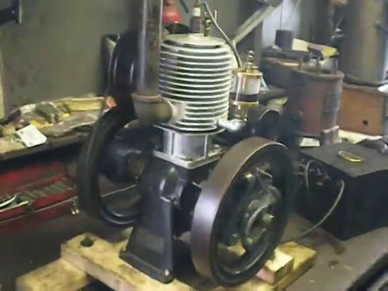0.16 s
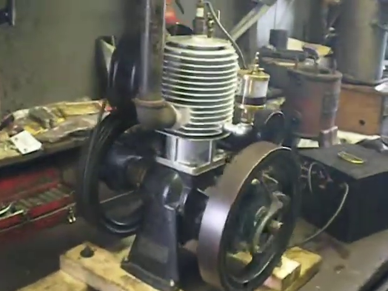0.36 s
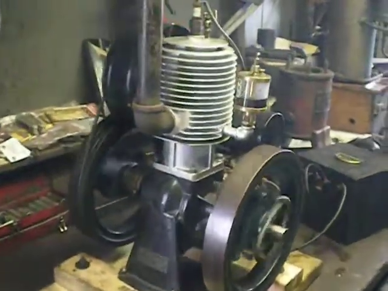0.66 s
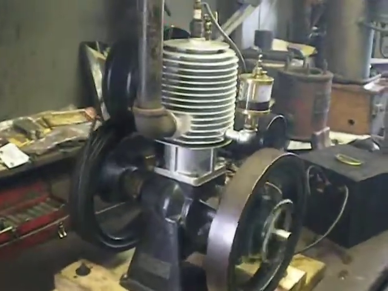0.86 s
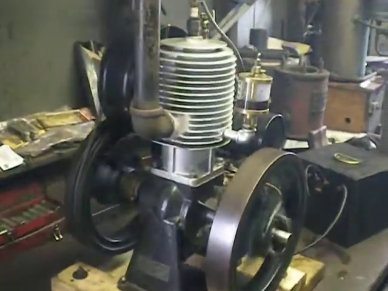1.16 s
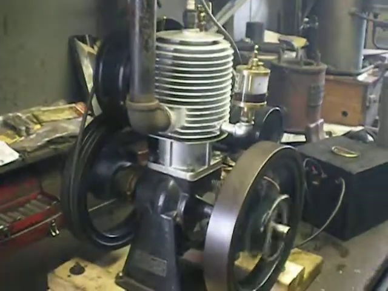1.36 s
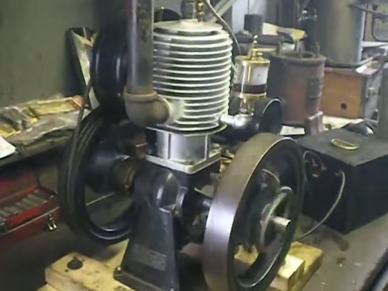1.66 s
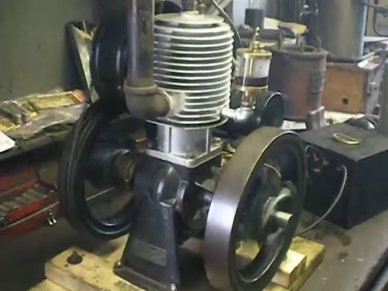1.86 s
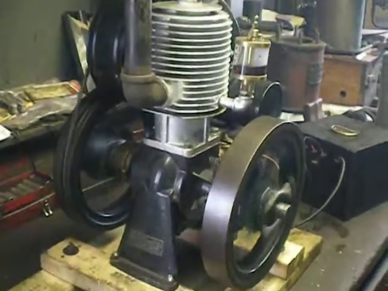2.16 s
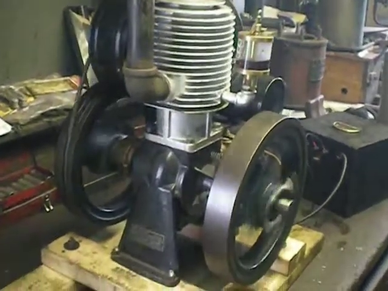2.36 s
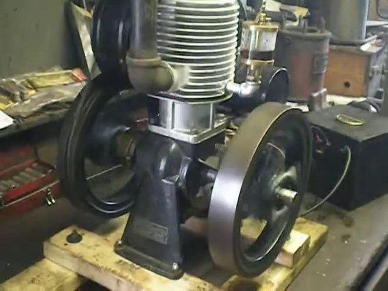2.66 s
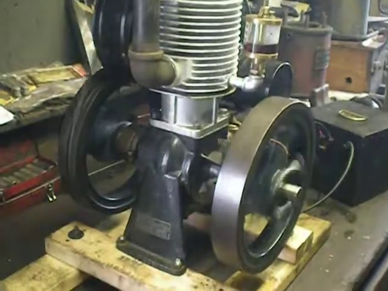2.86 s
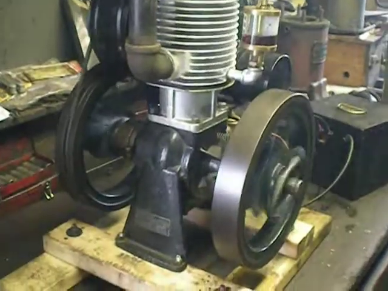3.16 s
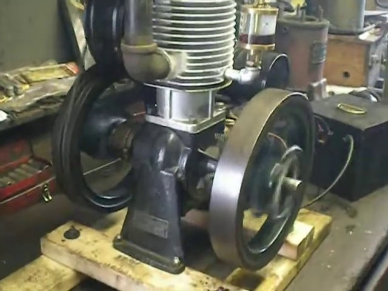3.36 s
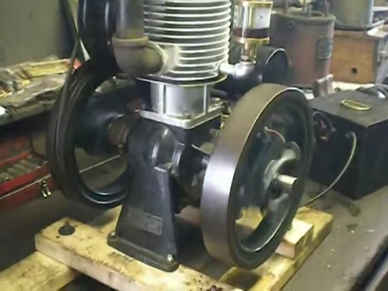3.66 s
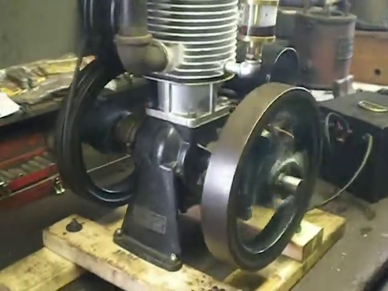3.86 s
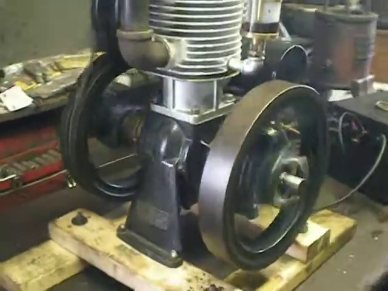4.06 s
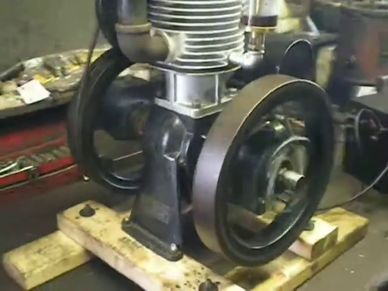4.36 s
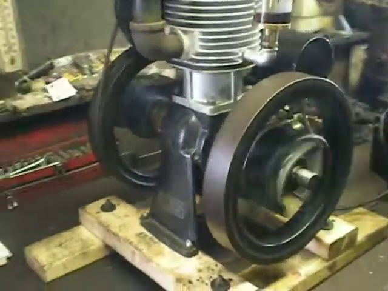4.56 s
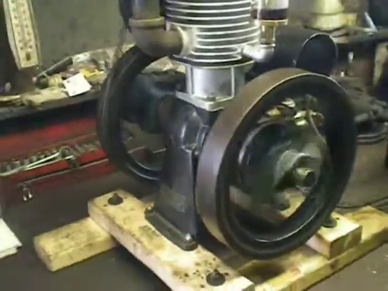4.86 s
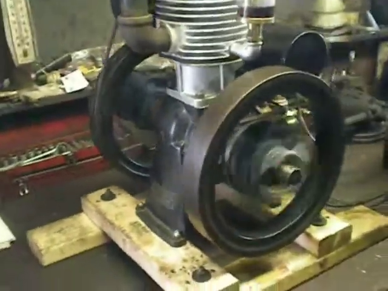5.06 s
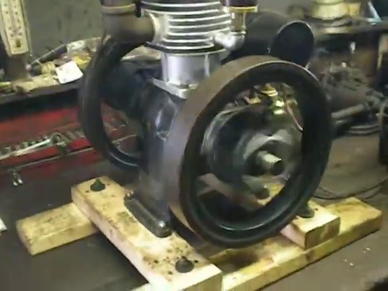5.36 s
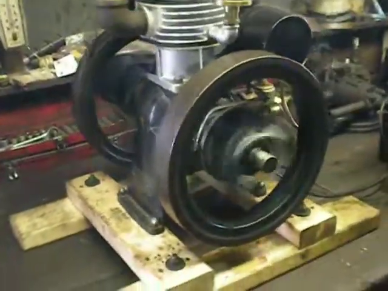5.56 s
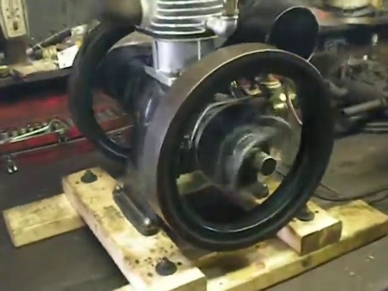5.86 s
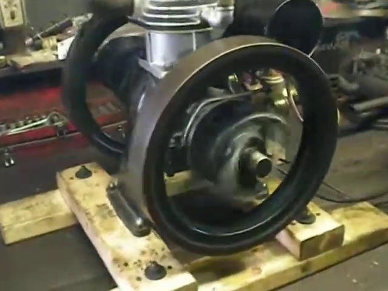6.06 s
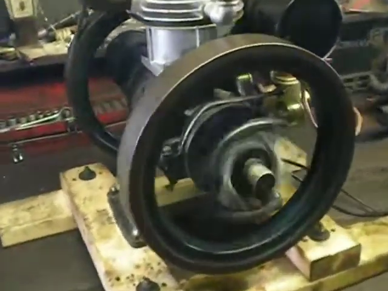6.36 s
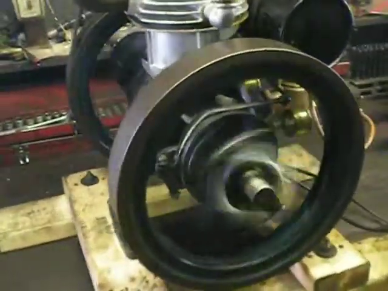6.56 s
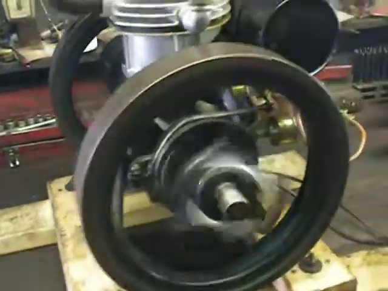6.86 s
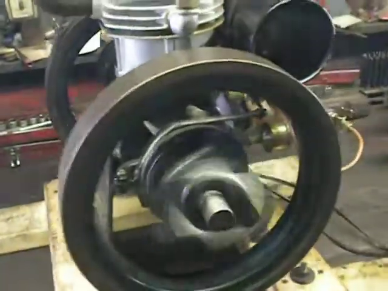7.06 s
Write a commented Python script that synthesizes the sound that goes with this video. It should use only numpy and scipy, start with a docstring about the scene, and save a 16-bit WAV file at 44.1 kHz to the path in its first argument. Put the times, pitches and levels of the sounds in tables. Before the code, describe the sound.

An old single-cylinder engine idles for about seven seconds, close up in a modestly reverberant workshop. It opens on a hollow drone, hiss and whirr; at about 0.1 s comes the first rasp, slap and hard metallic knock, repeating roughly five times a second with slight unevenness. Around 0.08 s after each knock a duller thump starts a low, hollow hoot near 200-250 Hz and a swelling airy hiss that fray before the next blow. Firings near 1.2, 1.6, 1.9 and 2.3 s add a boom, sputtering chuff and pop, softening the knock. After a gap without firing, more follow between 3.3 and 4.8 s, then at 5.8, 6.5 and 6.9 s. Tiny squeaks flick by near 1.3, 1.8, 3.5, 4.6 and 6.6 s. The flywheel's ring dips around 4 s, then grows stronger by 4.8 s, while the case pitch drifts slightly lower. Treble is muffled, peaks clipped; it keeps running to the end.

```python
"""A hollow drone, a hiss and a whirr are heard first; then rasp, slap and hard knock, about five times a second.
The source is an old air-cooled single-cylinder engine on wooden skids, idling in a workshop and firing now and then.
Its loose running gear strikes damped metal modes; a thump in mid-cycle starts the air resonance and turbulent hiss.
A firing adds a boom, a chuff and a pop from the exhaust pipe, made of a decaying tone and shaped noise.
A close microphone channel cuts the treble, then clips the loudest peaks."""
import sys
import numpy as np
from scipy import signal
from scipy.fft import rfft, irfft, next_fast_len
from scipy.io import wavfile

SR = 44100
rng = np.random.default_rng(int(sys.argv[2]) if len(sys.argv) > 2 else 0)


def wav_out(sig):
    """Save sig, one row per channel (or a flat mono array), as 16-bit PCM at SR to the path in sys.argv[1]."""
    wavfile.write(sys.argv[1], SR, np.round(np.clip(np.atleast_2d(sig).T, -1, 1) * 32767).astype(np.int16))


N = 318402
TIME = np.arange(N) / SR
STRIKE_TIME = np.arange(SR // 4) / SR  # time axis of one event, a quarter second

# Engine cycles: [knock t/s, relative knock level/dB, relative thump level/dB, air drawn after thump (0-1)]
CYCLES = [(-.12, 0, -9, 0.36), (.082, -11, -13.5, 0.58), (.2925, -10.5, -19.5, 0.4),
          (.494, -9.5, -15, 0.28), (0.6964, -10, -13.5, 0.7), (.912, -11, -17.5, 0.36),
          (1.122, -13.5, -15, 1), (1.349, -11.5, -17, 0.19), (1.526, -11.5, -13, .5),
          (1.7138, -10.5, -21, .15), (1.894, -17.5, -12.5, 0.49), (2.0792, -12, -16.5, 0.32),
          (2.2717, -11.5, -14, 0.49), (2.4735, -9.5, -19.5, 0.26), (2.667, -10, -15.5, 0.2),
          (2.871, -10.5, -13, 0.61), (3.082, -10, -15.5, 0.07), (3.286, -11, -12.5, 0.98),
          (3.512, -10, -17, .25), (3.689, -12, -14.5, 0.86), (3.88, -10.5, -22, 0.14),
          (4.059, -13, -14, 0.99), (4.2555, -10, -22, 0.04), (4.429, -11, -14.5, 0.74),
          (4.615, -11, -23.5, 0.06), (4.793, -13, -14.5, 0.5), (4.978, -11, -18.5, 0.2),
          (5.172, -12, -14.5, .6), (5.372, -11.5, -18, .45), (5.575, -12, -18.5, .35),
          (5.779, -10.5, -15, 0.62), (5.996, -11.5, -20, .3), (6.212, -10, -27, 0.2), (6.416, -12, -15, 1),
          (6.65, -11.5, -27.5, .25), (6.844, -15, -14.5, 1.), (7.0572, -11.5, -26, 0.16)]
# Firings, each lit at the knock before its pop: [pop t/s, relative chuff level/dB, relative pop level/dB]
FIRINGS = [(1.161, -23.5, -13), (1.56, -29, -26.5), (1.907, -23.5, -9), (2.305, -29.5, -30),
           (3.328, -24.5, -10), (3.722, -26, -11), (4.095, -23, -17.5), (4.464, -28, -9.5),
           (4.832, -31.5, -18), (5.82, -26.5, -21), (6.459, -23, -11), (6.881, -23.5, -20)]
# Brief squeaks, most of them just before the knock that follows a firing: [t/s, f/Hz, relative level/dB]
CHIRPS = [(1.329, 1820, -14), (1.838, 1778, -17.5), (3.492, 1788, -15.5), (4.594, 2080, -19.5),
          (6.635, 1810, -18.5)]
# Crankcase modes before pitch scaling and contact damping: [f/Hz, t60/s, relative level/dB]
BODY_MODES = [(263.6, 0.42, -10.5), (273.1, 0.15, -2), (414, 0.024, -26), (487, 0.026, -10.5),
              (607.5, 0.077, 9), (702.5, 0.067, -2.5), (844.8, 0.097, -1), (880, 0.0033, -17)]
# Thin iron parts, same conditions, excited by hard blows: [f/Hz, t60/s, relative level/dB]
IRON_MODES = [(1020, 0.075, -12.5), (1174, 0.03, 15), (1270, 0.088, -9), (1680, .02, -32),
              (1912, 0.056, -13.5), (2060, 0.008, -6.5), (3860, 0.012, -7.5)]
# Spectrum of the rattling metal contact: [f/Hz, relative level/dB]
CRACK_SPECTRUM = [(60, -38.5), (200, -7.5), (500, -2.5), (1100, 5), (1900, 2), (2700, -10), (3600, -4.5),
                  (4500, -2)]
# Spectrum of the turbulent intake air: [f/Hz, relative level/dB]
HISS_SPECTRUM = [(60, -39.5), (150, -29.5), (300, -6), (450, -1.5), (600, 3.5), (1000, -2), (1550, -4),
                 (2000, 3), (2350, 1), (2800, -5), (3600, -6), (4500, -8)]
# Spectrum of dry rubbing parts: [f/Hz, relative level/dB]
RASP_SPECTRUM = [(300, -11.5), (1200, 6.5), (2100, 5), (2700, -3.5), (3150, -1.5), (3650, 5.5),
                 (4500, -5.5)]
# Spectrum of the exhaust gas: [f/Hz, relative level/dB]
CHUFF_SPECTRUM = [(50, -38), (110, -19.5), (220, -18.5), (300, -10.5), (450, -7), (750, 3.5), (1000, -3),
                  (1250, 5.5), (1550, -7), (1850, -2.5), (2600, -31), (3500, -12), (4500, -17.5)]
# Spectrum of bearings, belt and flywheels: [f/Hz, relative level/dB]
WHIRR_SPECTRUM = [(25, -37.5), (70, -23), (115, -9), (160, -13.5), (290, 0.5), (450, -2.5), (600, -2),
                  (830, 3.5), (1000, -1.5), (1250, 0.5), (1900, -7), (2650, -14.5), (3600, -7.5),
                  (4500, -15)]
# Effect of facing the flywheel: [t/s, relative flywheel level/dB, relative drone level/dB]
FACING = [(0, -6.5, -0.5), (2.2, -6.5, 1.5), (3.9, -20.5, -1.5), (4.8, 2.5, 1.5), (5.9, 0.5, -0.5),
          (7.2, -1.5, 4)]
# Reference pitch of the case, mostly falling as the microphone comes round: [t/s, f/Hz]
CASE_PITCH = [(0, 598), (3, 594), (5, 570), (6, 578), (6.7, 548)]

CASE_REFERENCE_HZ = 595  # case pitch at which the body modes are unscaled
LAST_CYCLE_S = .2
THUMP_SHARE, RASP_SHARE = .39, .14  # of a cycle: thump after the knock, rasp before the next
CUSHION_POP_DB = -13  # a firing that pops this loud cushions the knock fully
DRONE_HZ, DRONE_DROP_HZ = 252.9, 51.38  # before the bend in each stroke: no air drawn; fall at full draw
SLAP_LEAD_S, SLAP_SCATTER_S = .0138, .0007
SHOP_T60_S, SHOP_DB = .33, -14
BAND_HZ, STOP_HZ, TOP_HZ = 3756, 4340, 15900  # microphone low-pass edges
CLIP = .71  # amplitude limit


def undb(db):
    """Logarithmic level: decibels become an amplitude ratio."""
    return 10 ** (np.asarray(db) / 20)


def fade(t, t60):
    """Exponential decay: the level falls 60 dB in t60 seconds."""
    return np.exp(-np.log(1000) * t / t60)


def add(out, s, sound):
    """Superposition: mix a sound in from time s, trimmed to the scene."""
    i = int(round(s * SR))
    a, b = max(i, 0), min(i + len(sound), N)
    if b > a:
        out[a:b] += sound[a - i:b - i]


def noise(colour, size=N):
    """Spectral shaping: filter white noise by (f/Hz, level/dB) points and normalise to rms 1."""
    hz, db = np.transpose(colour)
    n = next_fast_len(size)
    f = np.maximum(np.fft.rfftfreq(n, 1 / SR), 1)
    gain = undb(np.interp(np.log(f), np.log(hz), db))
    shaped = irfft(rfft(rng.standard_normal(n)) * gain, n)[:size]
    return shaped / shaped.std()


def flutter(rate):
    """Random modulation: straight lines join `rate` random values a second, with spread 1."""
    knots = rng.standard_normal(int(N / SR * rate) + 2)
    return np.interp(TIME * rate, np.arange(len(knots)), knots) * np.sqrt(3 / 2)


def cycles():
    """Engine timing: knock time, length, knock dB, thump dB, draw, previous draw (charge), burn (0-1)."""
    s, knock, thump, draw = np.transpose(CYCLES)
    draw = np.clip(draw, 0, 1)
    burns = {last_knock(pop_s): min(undb(pop - CUSHION_POP_DB), 1) for pop_s, _, pop in FIRINGS}
    length = np.diff(s, append=s[-1] + LAST_CYCLE_S)
    burn = [burns.get(t, 0) for t in s]
    return list(zip(s, length, knock, thump, draw, np.roll(draw, 1), burn))


def last_knock(s):
    """Event order: time of the knock just before s."""
    return max(row[0] for row in CYCLES if row[0] < s)


def workshop(x):
    """Diffuse reverberation: a decaying noise tail begins 5 ms after the direct sound."""
    tail = rng.standard_normal(len(STRIKE_TIME)) * fade(STRIKE_TIME, SHOP_T60_S) * (STRIKE_TIME > .005)
    tail /= np.sqrt(np.sum(tail ** 2))
    return x + undb(SHOP_DB) * signal.fftconvolve(x, tail)[:N]


def whirr(whirr_db=-25.5, grain_db=1.0, swell_db=2.5, rise_db=0.5, rise_share=0.15, rise_width=0.16):
    """Continuous friction noise: bearings, belt and flywheels run on, slightly louder after each knock."""
    knock_times = [row[0] for row in CYCLES]
    knock_times.append(knock_times[-1] + LAST_CYCLE_S)
    cycle_phase = np.interp(TIME, knock_times, np.arange(len(knock_times))) % 1
    rise = rise_db * np.exp(-((cycle_phase - rise_share) / rise_width) ** 2)
    level_db = whirr_db + rise + grain_db * flutter(300) + swell_db * flutter(25)
    return noise(WHIRR_SPECTRUM) * undb(level_db)


def skids(thud_db=-32.5, thud_hz=115.0, thud_t60=0.22, jolt_db=-44.0, jolt_s=0.0013):
    """Impulse response of a support: each knock jolts the skids, which boom on the bench."""
    out = np.zeros(N)
    tone = np.sin(2 * np.pi * thud_hz * STRIKE_TIME)
    boom = undb(thud_db) * tone * fade(STRIKE_TIME, thud_t60)
    jolt = undb(jolt_db) * np.exp(-STRIKE_TIME / jolt_s)
    for s, *_ in CYCLES:
        add(out, s, -boom - jolt)
    return out


def resonance(hz, rough):
    """Flow-sustained resonance: turbulence unsteadies the level and phase of a tone of rms 1."""
    flow = 1 + rough * (flutter(80) + 1j * flutter(80))
    carrier = np.exp(2j * np.pi * np.cumsum(hz) / SR)
    return np.real(flow * carrier) / np.sqrt(1 / 2 + rough ** 2)


def air(early_db=-25.5, early_draw_db=-1.5, late_db=-27.5, late_draw_db=-5.5, upper_db=-9.0,
        upper_ratio=2.55, hiss_db=-26.5, hiss_draw_db=5.0, sag=.06, grain_db=2.5):
    """Air resonance and turbulence: a drone and hiss from thump to knock; deep draw lowers and steadies it."""
    drone_gain, hiss_gain, rough = np.zeros((3, N))
    hz = np.full(N, DRONE_HZ, float)
    for s, length, _, _, draw, _, _ in cycles():
        start, end = s + THUMP_SHARE * length, s + length
        live = (TIME >= start) & (TIME < end)
        u = (TIME[live] - start) / (end - start)
        # pitch is lowest in mid-stroke
        hz[live] = (DRONE_HZ - DRONE_DROP_HZ * draw) * (.99 + sag * (2 * u - 1) ** 2)
        # the drone frays as the flow grows turbulent
        rough[live] = .1 + (.8 - .6 * draw) * u ** 2
        early, late = early_db + early_draw_db * draw, late_db + late_draw_db * draw
        drone_levels = undb([-60, early, early - .5, late, late - 1.5, -60])
        drone_gain[live] = np.interp(u, [0, .03, .28, .55, .9, 1], drone_levels)
        swell = np.interp(u, [0, .2, .45, .75, .88, 1], [-10.5, -4, 2.5, 3.5, 0.5, -16.0])
        hiss_gain[live] = undb(hiss_draw_db * draw + swell)
    drone = resonance(hz, rough) + undb(upper_db) * resonance(upper_ratio * hz, 2 * rough)
    hiss = noise(HISS_SPECTRUM) * hiss_gain * undb(hiss_db + grain_db * flutter(450))
    # both resonances break up late in the stroke
    drone *= 1 - np.clip(.5 * rough * (1 + flutter(30)), 0, .9)
    times, _, near_db = np.transpose(FACING)
    return undb(np.interp(TIME, times, near_db)) * drone_gain * drone + hiss


def scrapes(rasp_db=-16.0, rasp_s=0.005, scatter_db=1.5, chirp_db=1.5, chirp_s=0.0046):
    """Dry friction: rubbing noise peaks ahead of each slap; brief tones squeak at listed times."""
    peaks = [s + (1 - RASP_SHARE) * length for s, length, *_ in cycles()]
    sizes = undb(rasp_db + scatter_db * rng.standard_normal(len(peaks)))
    envelope = sum(size * np.exp(-np.abs(TIME - s) / rasp_s) for s, size in zip(peaks, sizes))
    out = envelope * noise(RASP_SPECTRUM)
    wobble = 0.12 * flutter(770)  # phase, rad
    for s, hz, db in CHIRPS:
        pulse = np.exp(-((TIME - s) / chirp_s) ** 2)
        tone = np.sqrt(2) * np.sin(2 * np.pi * hz * TIME + wobble)
        out += undb(db + chirp_db) * pulse * tone
    return out


def attack_level(y):
    """Onset normalisation: scale an event to rms 1 over its first 9 ms."""
    return y / np.sqrt(np.mean(y[:SR * 9 // 1000] ** 2))


def exhaust(chuff_db=9.0, pop_db=-5.0, boom_db=9.5, boom_hz=276.0, boom_t60=0.13, grain_db=2.0):
    """Pulsed gas flow: a firing booms in the cylinder, gas sputters in a swell, and a pop sounds in the pipe."""
    out, gas = np.zeros((2, N))
    rush = np.interp(STRIKE_TIME, [.012, .022, .038, .05, .066], [0.16, 0.53, 1.0, 0.54, 0])
    onset = 1 - np.exp(-STRIKE_TIME / 0.0005)
    boom = np.cos(2 * np.pi * boom_hz * STRIKE_TIME) * fade(STRIKE_TIME, boom_t60) * onset
    for pop_s, db, pop_level_db in FIRINGS:
        s = last_knock(pop_s)
        add(out, s, undb(db + boom_db) * boom)
        add(gas, s, undb(db + chuff_db) * rush * noise(CHUFF_SPECTRUM, size=len(STRIKE_TIME)))
        pop = attack_level(noise(CHUFF_SPECTRUM, size=len(STRIKE_TIME)) * fade(STRIKE_TIME, 0.043))
        add(out, pop_s, undb(pop_level_db + pop_db) * pop)
    return out + gas * undb(grain_db * flutter(250))


def flywheel(blows, wheel_hz=815.4, width_hz=59.0, wheel_db=3.0):
    """Resonant filtering: blows travel down the crankshaft and ring the flywheel."""
    b, a = signal.iirpeak(wheel_hz, wheel_hz / width_hz, fs=SR)
    s, db, _ = np.transpose(FACING)
    return undb(wheel_db + np.interp(TIME, s, db)) * signal.lfilter(b, a, blows)


def case_hz(s):
    """Pitch interpolation: the reference ring of the case at time s."""
    return np.interp(s, *np.transpose(CASE_PITCH))


def ring(modes, stretch, detune, scatter_db):
    """Modal superposition: decaying modes vary a little in pitch and level with every blow."""
    hz, t60, db = np.transpose(modes)[:, :, None]
    shift, size = rng.standard_normal((2, len(modes), 1))
    gain = undb(db + scatter_db * size)
    mode_hz = hz * stretch * (1 + detune * shift)
    return np.sum(gain * fade(STRIKE_TIME, t60) * np.cos(2 * np.pi * mode_hz * STRIKE_TIME), 0)


def blow(ring_hz, bright_db, contact_s, damp_s, crack_db, crack_t60):
    """Impact excitation: load-damped case modes, thin iron parts and contact rattle sound together."""
    push = 1 - np.exp(-STRIKE_TIME / contact_s)
    damping = np.exp(-(STRIKE_TIME / damp_s) ** 2)
    case_modes = ring(BODY_MODES, ring_hz / CASE_REFERENCE_HZ, detune=.012, scatter_db=2.5)
    body = attack_level(case_modes * push * damping)
    iron = attack_level(ring(IRON_MODES, 0.98, detune=0.03, scatter_db=3) * push * damping)
    rattle = noise(CRACK_SPECTRUM, size=len(STRIKE_TIME))
    crack = attack_level(rattle * push * fade(STRIKE_TIME, crack_t60))
    return body + undb(bright_db) * (undb(-10.5) * iron + undb(crack_db) * crack)


def thumps(thump_db=-1.07, bright_db=-6.0, lead_s=.002):
    """Impact with slow contact: the mid-cycle blow rings lower the more air is drawn."""
    out = np.zeros(N)
    for s, length, _, db, draw, _, _ in cycles():
        ring_hz = case_hz(s) * (1.025 - .075 * draw)
        thump = blow(ring_hz, bright_db, contact_s=.0015, damp_s=.028, crack_db=-1.0, crack_t60=.05)
        add(out, s + THUMP_SHARE * length - lead_s, undb(db + thump_db) * thump)
    return out


def slaps(slap_db=-3.0, cushion_db=-4.5, bright_db=-2.5, charge_bright_db=-5.0):
    """Impact through play: loose gear closes just ahead of the knock, more softly when the charge burns."""
    out = np.zeros(N)
    for s, _, db, _, _, charge, burn in cycles():
        bright = bright_db + charge_bright_db * charge
        slap = blow(.99 * case_hz(s), bright, contact_s=.0008, damp_s=.028, crack_db=-3.5, crack_t60=.03)
        lead = SLAP_LEAD_S + SLAP_SCATTER_S * rng.standard_normal()
        add(out, s - lead, undb(db + slap_db + cushion_db * burn) * slap)
    return out


def knocks(knock_db=0.0, bright_db=-4.0, charge_bright_db=8.0, cushion_bright_db=-20.5, lead_s=.0009,
           rebound_s=.007, rebound_db=-13.5, cushion_rebound_db=-11.0):
    """Impact and rebound: brighter after a deep draw of air, dull when the charge burns."""
    out = np.zeros(N)
    for s, _, db, _, _, charge, burn in cycles():
        bright = bright_db + charge_bright_db * charge + cushion_bright_db * burn
        knock = blow(case_hz(s), bright, contact_s=.0011, damp_s=.007, crack_db=-1.5, crack_t60=.035)
        add(out, s - lead_s, undb(db + knock_db) * knock)
        rebound = attack_level(noise(CRACK_SPECTRUM, size=len(STRIKE_TIME)) * fade(STRIKE_TIME, 0.03))
        add(out, s + rebound_s, undb(rebound_db + cushion_rebound_db * burn) * rebound)
    return out


def running_gear(radiate_hz=163.0):
    """Radiation efficiency: a case this small radiates little bass from its slaps, knocks and thumps."""
    radiation = signal.butter(2, radiate_hz, "high", fs=SR, output="sos")
    return signal.sosfilt(radiation, slaps() + knocks() + thumps())


def scene():
    """Superposition: all parts of the engine sound together in the reverberant room."""
    blows = running_gear()
    engine = blows + flywheel(blows) + skids() + air() + scrapes() + exhaust() + whirr()
    return workshop(engine)[None]


def record(dry):
    """Band limiting and saturation: low-pass the microphone signal, clip its peaks, low-pass again."""
    band = signal.butter(14, BAND_HZ, fs=SR, output="sos")
    stop = signal.ellip(8, .3, 60, STOP_HZ, fs=SR, output="sos")
    top = signal.ellip(8, .2, 70, TOP_HZ, fs=SR, output="sos")
    narrow = signal.sosfilt(stop, signal.sosfilt(band, dry))
    return signal.sosfilt(top, np.clip(narrow, -CLIP, CLIP))


dry = scene()
out = record(dry)
wav_out(out)
```